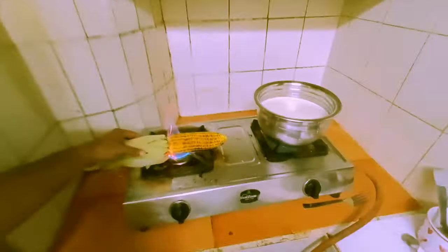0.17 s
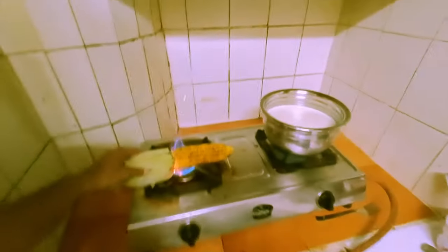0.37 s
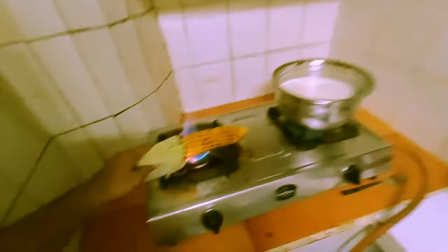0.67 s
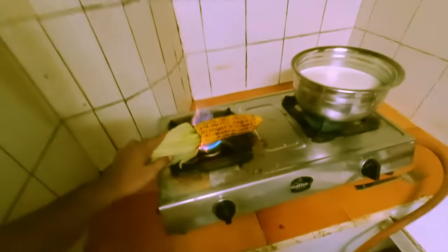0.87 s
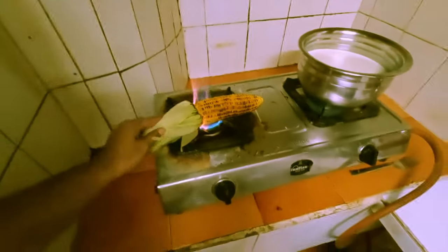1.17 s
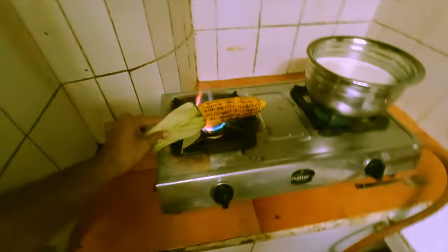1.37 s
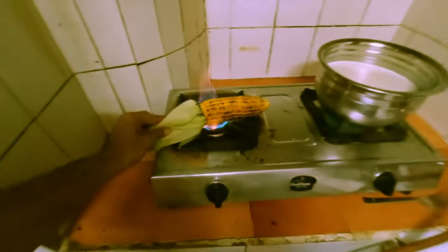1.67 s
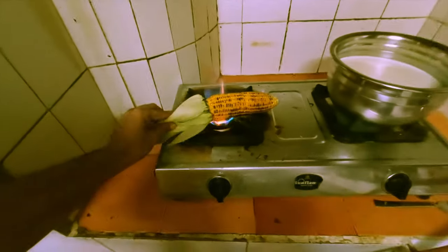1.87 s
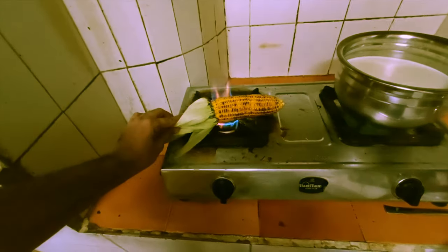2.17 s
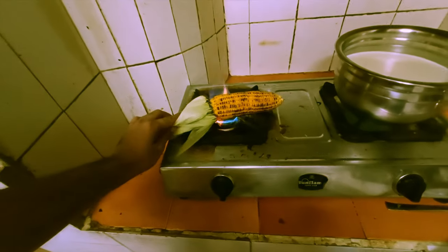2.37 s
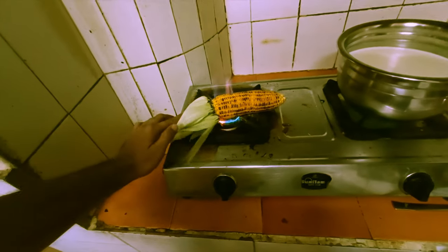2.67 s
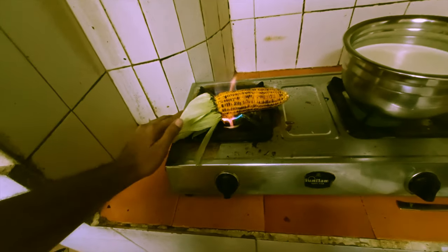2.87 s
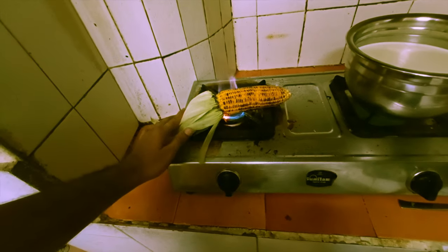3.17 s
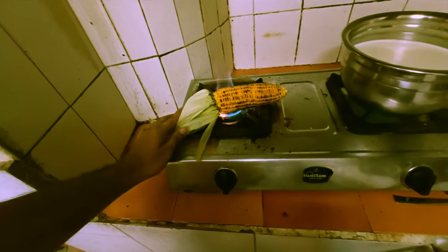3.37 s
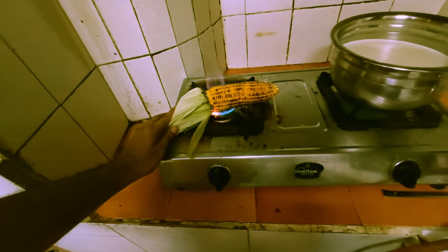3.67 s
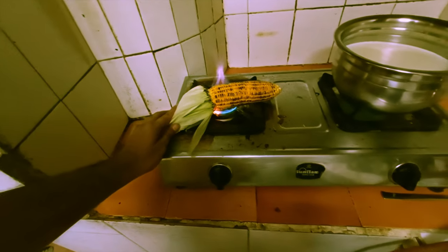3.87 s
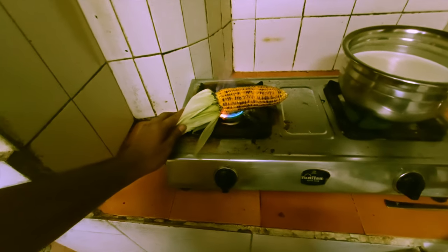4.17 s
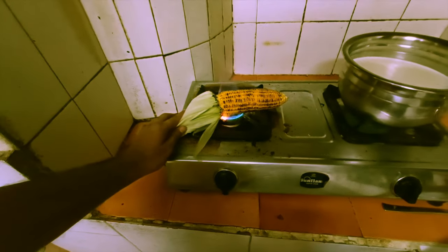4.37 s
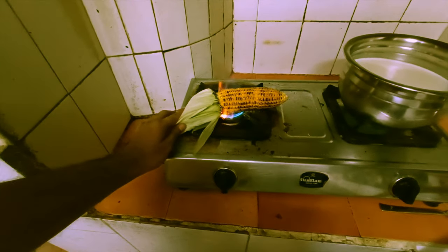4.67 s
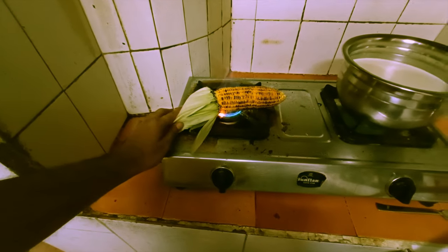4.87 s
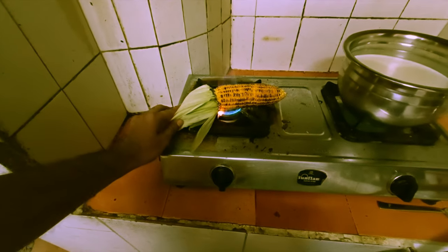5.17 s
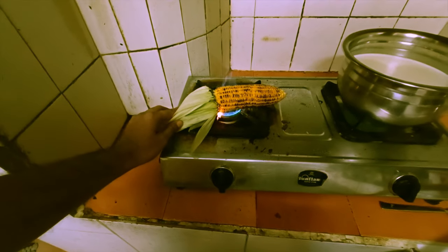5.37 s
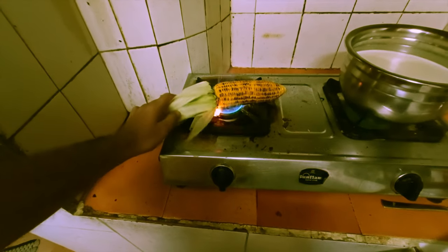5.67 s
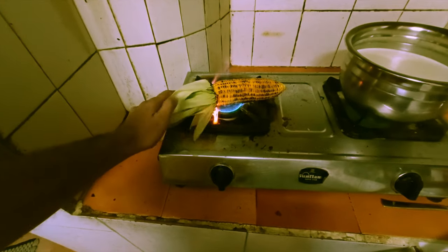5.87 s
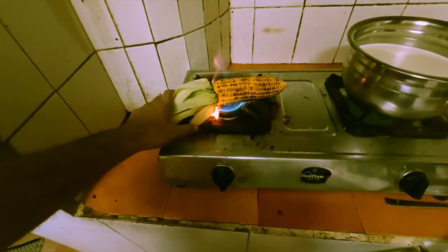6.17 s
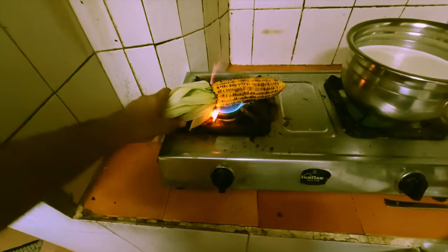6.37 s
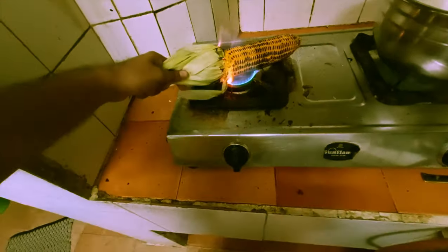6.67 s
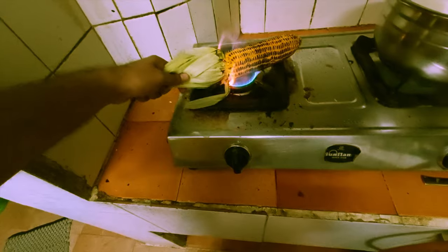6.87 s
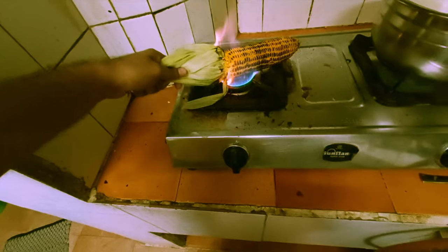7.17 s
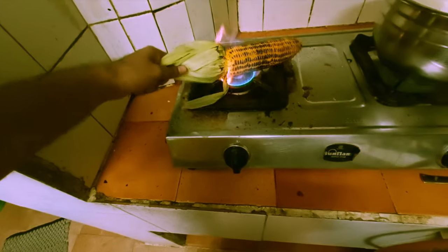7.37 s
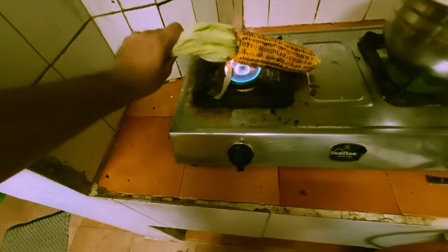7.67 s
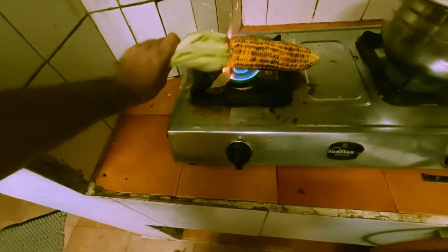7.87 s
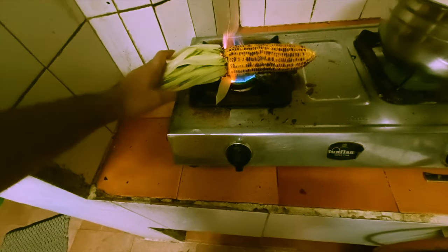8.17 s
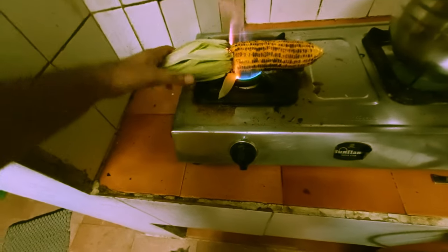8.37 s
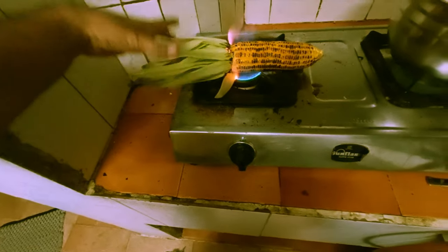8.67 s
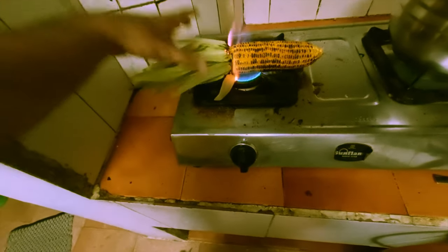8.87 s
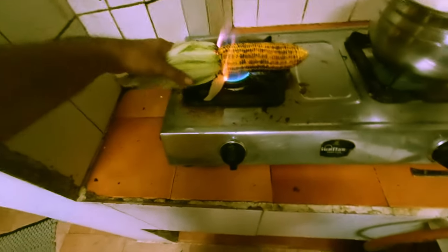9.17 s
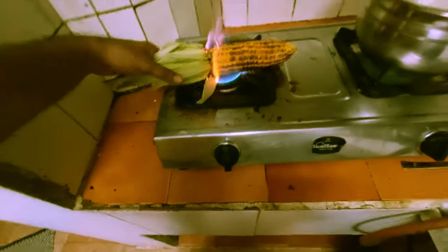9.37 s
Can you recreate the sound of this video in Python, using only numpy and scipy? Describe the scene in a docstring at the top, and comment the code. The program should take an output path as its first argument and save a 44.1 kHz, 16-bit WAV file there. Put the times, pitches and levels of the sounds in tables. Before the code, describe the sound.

A gas burner hisses softly throughout, with a low flame roar and tiny sizzles, close to a hand-held microphone in a tiled kitchen corner. For the first second, low handling thumps sit under a brief puff of steam and small pops from a roasting corn cob. Another bump and a few pops come around 1.3 seconds. Sharp, loud kernel pops follow at about 2.1, 2.4 and 2.9 seconds, each with a short echo, the last with a light ring of the metal stove. Only small ticks and very faint high tones follow until a loud cluster of pops and a steam puff at 5.5 seconds. Another loud pop lands at 6.2, and a quick, softer crackle near 6.9. Faint dry husk scrapes and light metal knocks come between 6 and 8 seconds. A few weak pops and knocks close it around 9 seconds.

```python
"""A puff of steam and low thumps of a hand on the camera, then sharp pops: a corn cob roasts over a gas
flame in a tiled kitchen corner, heard from the microphone of a hand-held camera. Kernels burst and
puff steam, and the near tiles answer each pop. The cob knocks the sheet-metal stove into ringing, its
dry husk scrapes the pan stand, faint thin tones come and go, and the burner hisses throughout."""
import sys
import numpy as np
from scipy import signal
from scipy.io import wavfile
from scipy.ndimage import uniform_filter1d

SR = 44100
rng = np.random.default_rng(int(sys.argv[2]) if len(sys.argv) > 2 else 0)


def unload_audio(sound):
    """Save the sound as a 16-bit wav file, at the path given as the first command line argument."""
    columns = np.transpose(np.atleast_2d(sound))
    # keep every value between -1 and 1, then stretch to whole-number steps
    steps = np.round(np.clip(columns, -1, 1) * 32767)
    wavfile.write(sys.argv[1], SR, steps.astype(np.int16))


N = 418950


def pops():
    """Pops, a snap in a short tear of noise; cob and hollow ring, the corner answers."""
    # Each row: start in seconds, level in dB, treble and low end in dB, tear decay in ms,
    # room and cob ring in dB, favoured cob pitch in Hz, hollow ring in dB.
    # The loudest pop is followed 3 ms later by a duller echo.
    pop_rows = [(0.3688, -25, -1, 9, 1, 3, -10, 2550, -12), (0.689, -39, 15.5, -8, 1.8, -2, -14, 4700, -20),
                (0.7578, -33.5, 9, -8, 1.6, 5, -10, 1600, -16),
                (0.961, -35, -1, 13.5, 2.7, -4, 1, 2680, -2),
                (1.0307, -30.5, -1, 10, 1.5, 3.5, -4, 2630, -15),
                (1.087, -41, 16, -8, 1.8, -10, -10, 4700, -20),
                (1.2026, -28.5, 2, -15, 1.7, -6.5, 7.5, 4060, -22),
                (1.2585, -15.5, 7, -2, 5.6, -6.5, -8, 4700, -12),
                (1.3222, -21, 4, -3, 3.4, -7.5, 3, 2820, -8),
                (2.0799, -13, 1.5, -28, 11, -7.5, -3, 2760, -20),
                (2.1477, -41, 16, -2, 1.8, -7.5, -5, 5110, -15), (2.325, -32, 4, 14, 2, 4.5, -15, 3800, 2),
                (2.3932, 1, 10.5, -22, 1.9, -1, -8.5, 4560, -36),
                (2.5024, -22, 14.5, -20, 3.8, -4, -10, 4890, -22),
                (2.9291, 3.5, 6.5, 2, 4, -2.5, -6.5, 4340, -31),
                (3.1662, -33.5, 4, 12, 2.8, -9, -3, 2760, -5),
                (3.359, -37.5, 12, -4, 1.4, 3, -3, 4790, -12), (3.9458, -31, 4, 8, 3.7, 3, 3, 3480, -6),
                (4.0512, -27.5, 8.5, 11.5, 1.6, -16, -7, 1870, -10),
                (4.8266, -35, 12, -12, 1.8, 1, -9, 4150, -20),
                (4.9683, -37.5, 18.5, -8, 2.9, -2, 4, 5070, -16),
                (5.4382, -8, 8, -5, 2.2, -3, -6, 4400, -12), (5.4853, 7.5, 1, 8, 1.4, -4.5, -4, 3230, -7),
                (5.488, 0.5, -12, -6, 0.97, 0, -4.5, 2040, -28),
                (5.539, -3.5, 12.5, -5, 1.1, 3.5, -18, 4720, -15),
                (6.0356, -34, 8, -3, 1.3, -11, -4, 3770, -12),
                (6.192, -0.5, 8.5, 1.5, 0.69, -5.5, -5, 4250, -17.5),
                (6.265, -27, 2, -5, 2.5, 3, 3, 3600, -5), (6.8016, -37.5, 13, -3, 1.8, 5, -3, 3470, -12),
                (6.8575, -17, 13.5, 3.5, .8, 0, 1, 4270, -21), (6.872, -34, -2, -6, 1.2, -10, 0, 3550, -19),
                (6.9135, -16, 10.5, -4, 0.61, -4.5, 0, 3500, -24),
                (6.9668, -20, 10, -3, 2.4, -3.5, 2, 3800, -10),
                (7.3068, -28, 12.5, -12, 4.4, -4, 0, 4340, -15),
                (7.826, -36.5, -9, 10, 1.7, 8, -3, 2600, -14), (7.3976, -35, 3, -9, 1.8, 9, -14, 2460, -20),
                (8.848, -34, -7, 15, 2.5, 3, -1, 3280, -13), (8.9811, -36, 4.5, -8, 2, 10, -3, 3160, -4),
                (9.0724, -42, 3, 22, 1.3, 7, 8, 2880, 5)]
    # Spectrum of a pop. Each row: frequency in Hz, relative level in dB.
    pop_colour = [(240, -37.5), (400, -11.5), (715, -12), (914, -8.5), (1420, -15.5), (1710, -19.5),
                  (2250, -16.5), (2430, -15.5), (3790, -4.5), (4420, -3.5), (6280, -14.5), (7900, -20.5),
                  (9800, -16), (12100, -15), (15500, -21)]
    # The air under the pan stand rings. Each row: pitch in Hz, relative level in dB, t60 in seconds.
    hollow_modes = [(913, -3, 0.71), (915, 6, 0.44), (924, 10, .09), (938, -3, 0.83), (1010, -2, 0.16),
                    (1010, -3, 0.25), (1101, 5, 0.43), (1184, -12.5, 0.097)]
    # The cob's woody modes, in Hz.
    cob_hz = [1710, 1980, 2676, 3130, 3445, 3640, 4330, 4700, 4790, 5730]
    cob_t60_s, cob_octaves = 0.022, 0.42
    t, out = np.arange(600) / SR, np.zeros(N)
    rooms = [corner() for _ in range(3)]
    colour = impulse_response(pop_colour)
    colour = np.pad(colour / np.linalg.norm(colour), (0, 10000))
    top = signal.sosfilt(butter(2, 7500, "high"), colour)
    bottom = signal.sosfilt(butter(2, 1700, "low"), colour)
    middle = colour - top - bottom
    body = signal.sosfilt(butter(2, 420, "high"), bottom)  # a kernel is too small for bass
    hollow = ringing(hollow_modes, len(colour))
    tears = rng.standard_normal((len(pop_rows), len(t)))
    for k, (s, db, treble_db, low_db, ms, room_db, cob_db, centre_hz, hollow_db) in enumerate(pop_rows):
        click = middle + amp(treble_db) * top + amp(low_db) * body + amp(hollow_db) * hollow
        cob_modes = [(hz, -10 * (np.log2(hz / centre_hz) / cob_octaves) ** 2, cob_t60_s) for hz in cob_hz]
        click += amp(cob_db) * ringing(cob_modes, len(click))  # modes near the favoured pitch lead
        age = t * 1000 / ms
        tear = tears[k] * np.minimum(age * 18, 1) * np.exp(-age)
        tear /= np.linalg.norm(tear)
        tear[20] -= 0.42  # the snap comes half a millisecond into the tear
        add(out, s, amp(db) * signal.fftconvolve(tear, click))
        add(out, s, amp(db + room_db) * signal.fftconvolve(click, rooms[k % 3]))
    return out


def knocks():
    """The cob sets the stove's sheet metal ringing, most of all near the touched spot's favoured pitch."""
    # Each row: start in seconds, ring level in dB, favoured pitch in Hz, spread in octaves,
    # boom level in dB, contact time in ms.
    contacts = [(1.251, -36.5, 298, 0.8, -46, 7.6), (1.318, -35, 332, 1.35, -38, 1.7),
                (1.772, -41.5, 590, 1.9, -49, 9.4), (2.0, -43, 610, 1.8, -41.5, 5.5),
                (2.075, -41, 395, 0.79, -54, 3.3), (2.391, -40.5, 356, 1.1, -56.5, 1.3),
                (2.927, -23.5, 225, 0.86, -35.5, 1.1), (3.637, -49, 200, 1.2, -42.5, 1.5),
                (3.84, -51, 200, 1.5, -53.5, 6), (5.484, -33.5, 222, 0.83, -61, 6.3),
                (6.19, -40.5, 260, 1.2, -69, 1.8), (6.468, -38, 467, 0.23, -63, 24),
                (6.48, -39, 960, 0.41, -66, 2.6), (6.53, -39, 705, 0.84, -63, 9.7),
                (6.59, -35, 574, 0.24, -65, 2.6), (7.141, -34.5, 308, 1.06, -60, 16),
                (7.18, -39.5, 435, 0.5, -60, 7.6), (7.232, -40, 198, 0.71, -66, 7.5),
                (7.821, -33.5, 255, 1.65, -46.5, 6.7), (8.848, -31, 377, 0.23, -69, 17),
                (8.848, -40.5, 205, 0.37, -64, 12), (8.849, -33, 803, 0.78, -72, 7.7),
                (9.073, -30, 870, 0.51, -69, 20)]
    # Modes of the sheet. Each row: pitch in Hz, relative level in dB, t60 in seconds.
    stove_modes = [(190.2, 4, 0.25), (226.3, 2, 0.26), (284, 5, 0.15), (311.6, 9.5, 0.077),
                   (377, 0.5, 0.21), (458.4, -7.5, 0.3), (557, 10, 0.079), (713, 5.5, 0.19), (782, -4, 0.3),
                   (955, 7.5, 0.1), (1110, -1, 0.12), (1317, 13, 0.061), (1452, 13, 0.086),
                   (1670, 11, 0.086), (2390, -6, .05), (2850, 21, .06), (3400, -6, .05)]
    boom_hz, boom_t60_s = 81, 0.85  # the whole stove top
    t, out = np.arange(SR * 3 // 4) / SR, np.zeros(N)
    hz, mode_db, t60 = np.transpose(stove_modes)[:, :, None]
    phases = 2 * np.pi * rng.random((len(contacts), len(stove_modes), 1))
    rattle = unit(uniform_filter1d(rng.standard_normal((len(contacts), len(t))), size=300, axis=1))
    boom = dying_sine(t, boom_hz, boom_t60_s)
    for k, (s, db, centre_hz, octaves, boom_db, ms) in enumerate(contacts):
        weights = amp(mode_db - 10 * (np.log2(hz / centre_hz) / octaves) ** 2)
        ring = (weights * dying_sine(t, hz, t60, phases[k])).sum(0) / np.linalg.norm(weights)
        ring *= 1 + 0.3 * rattle[k]  # the loose stand rattles against the sheet
        attack = 1 - np.exp(-t * 1000 / ms)
        add(out, s, (amp(db) * ring + amp(boom_db) * boom) * attack)
    return out


def steam():
    """Steam rushes from a split kernel: bright noise that rises, holds and dies away."""
    # Each row: start, rise and hold in seconds, level in dB, t60 in seconds.
    puffs = [(0.005, 0.0033, 0.0086, -39.5, 0.1), (5.554, .004, 0.054, -34, 0.34),
             (6.832, .006, .002, -31.5, 0.12), (6.906, .005, 0.017, -61, .2), (9.08, .01, 0.064, -72, 0.59)]
    # Spectrum of the rush. Each row: frequency in Hz, relative level in dB.
    steam_colour = [(400, -15), (1000, 5), (2500, -1.5), (4600, 4), (6000, -12), (7800, -9), (10000, 2),
                    (12300, -1.5), (15500, 9)]
    t, level = np.arange(SR // 2) / SR, np.zeros(N)
    for s, rise, hold, db, t60 in puffs:
        fall_db = 60 * np.maximum(t - rise - hold, 0) / t60
        add(level, s, np.minimum(t / rise, 1) * amp(db - fall_db))
    return level * noise(steam_colour, patchy_db=2.5, size=256)


def husk():
    """Dry leaves scrape the stand in dense uneven grains; each stroke swells quickly and dies slowly."""
    # Each row: start and length in seconds, level in dB, treble lift in dB.
    strokes = [(0.644, 0.099, -56, 3), (0.768, .05, -59, 10), (0.91, 0.059, -57.5, -1),
               (1.025, 0.15, -58, 11.5), (1.726, 0.13, -68, 18), (5.71, 0.12, -60, 10),
               (6.214, 0.13, -53, 4), (6.34, .03, -60, 6), (6.425, .2, -53, 14.5), (7.038, 0.067, -75, 31),
               (7.46, 0.099, -71, 23)]
    # Spectrum of a grain. Each row: frequency in Hz, relative level in dB.
    husk_colour = [(180, -35), (300, -53), (446, -25), (509, -3.5), (985, -4), (1420, -16), (3230, -5.5),
                   (4880, -8.5), (5480, -30), (9930, -24), (15500, -22)]
    grains_per_s, peak_share = 3000, 0.2
    grains = amp(1.2 * rng.exponential(1, N)) * (rng.random(N) < grains_per_s / SR)
    grains *= rng.standard_normal(N)
    rustle = unit(signal.oaconvolve(grains, impulse_response(husk_colour))[:N])
    top = signal.sosfiltfilt(butter(4, 7000, "high"), rustle)
    t, out = np.arange(N) / SR, np.zeros(N)
    for s, length, db, treble_db in strokes:
        swell = np.sqrt(np.interp(t, [s, s + peak_share * length, s + length], [0, 1, 0]))
        out += amp(db) * swell * (rustle - top + amp(treble_db) * top)
    return out


def grip():
    """Handling noise at the microphone: bumps ring the camera body over a lumpy rumble."""
    # Each row: start in seconds, then levels of the middle, low and top mode in dB.
    bumps = [(0.0, -20, -29, -34), (.083, -19.5, -21, -37.5), (0.164, -19, -21.5, -34),
             (0.218, -15.5, -44, -30), (0.245, -15.5, -21, -32), (0.307, -53, -7.5, -39),
             (0.328, -17.5, -11.5, -28), (0.391, -36, -14, -49), (.425, -28.5, -53, -45),
             (0.533, -42, -28, -58), (0.629, -51, -30.5, -62), (0.758, -12, -22, -37)]
    # The body's middle, low and top mode. Each row: pitch in Hz, t60 in seconds.
    camera_modes = [(96.2, 0.14), (52.5, 0.26), (270.5, 0.045)]
    # Rumble of the grip. Each row: time in seconds, level in dB.
    rumble_levels = [(0.85, -62), (1.16, -58), (1.28, -54), (1.55, -51), (1.67, -40.5), (1.8, -56.5),
                     (2.3, -55.5), (2.8, -59), (2.95, -62), (3.43, -59), (3.7, -48), (3.98, -50),
                     (4.15, -62), (5.5, -63), (6.4, -57.5), (7.6, -56), (8.9, -59.5), (9.3, -57),
                     (9.5, -55)]
    # Its spectrum. Each row: frequency in Hz, relative level in dB.
    rumble_colour = [(8, -14), (20, 26.5), (50, 16), (80, -6), (150, -58), (400, -64)]
    press_at_s, press_in_s, press_db = 1.232, 0.056, -25  # the hand presses the camera once
    out = gain_curve(rumble_levels) * noise(rumble_colour, patchy_db=2.5, size=4096)
    t = np.arange(SR // 2) / SR
    attack = 1 - np.exp(-t / 0.0025)
    modes = np.array([dying_sine(t, hz, t60) * attack for hz, t60 in camera_modes])
    modes[1] *= -1  # the low mode starts by swinging the other way
    for s, *levels_db in bumps:
        add(out, s, amp(levels_db) @ modes)
    size = round(press_in_s * SR)
    press = np.concatenate([np.hanning(size), -np.hanning(2 * size) / 2])  # in, then slowly back
    add(out, press_at_s, amp(press_db) * press)
    return out


def thin_tones():
    """Faint, thin, fuzzy high tones, some gliding in pitch."""
    # Each row: start and length in seconds, first and last pitch in Hz, level in dB, width in Hz.
    tones = [(4.747, 0.1, 11750, 11900, -64, 150), (5.04, .12, 11600, 11300, -66, 250),
             (5.13, 0.18, 10300, 10300, -71, 220), (6.028, 0.098, 12700, 11000, -66, 200),
             (6.216, 0.099, 11500, 11600, -65, 200), (6.301, 0.1, 11100, 11800, -61, 200),
             (7.048, 0.086, 2000, 1970, -67.5, 8.7), (7.261, 0.042, 11100, 9300, -62, 250),
             (7.392, 0.046, 2470, 2500, -61.5, 16), (8.099, 0.021, 6750, 6750, -63, 34)]
    out = np.zeros(N)
    for s, length, start_hz, end_hz, db, width_hz in tones:
        size = round(length * SR)
        fuzz = uniform_filter1d(rng.standard_normal((2, SR // 4)), round(SR / width_hz / 2))[:, :size]
        carrier = np.exp(2j * np.pi * np.cumsum(np.geomspace(start_hz, end_hz, size)) / SR)
        tone = unit((carrier * (unit(fuzz[0]) + 1j * unit(fuzz[1]))).real)
        add(out, s, amp(db) * tone * signal.windows.tukey(size, 0.5))
    return out


def burner():
    """The gas jet hisses above the flame's soft roar, with tiny sizzles."""
    # The burner fades a little as the camera moves. Each row: time in seconds, hiss and roar in dB.
    levels = [(0.0, -59.5, -57.5), (1.3, -58.5, -57.5), (2.5, -59.5, -58.5), (4.6, -60.5, -59),
              (5.4, -60, -58), (6.3, -57.5, -57), (6.7, -61, -60), (7.1, -60, -57.5), (8.3, -60.5, -60.5),
              (8.8, -61.5, -60), (9.1, -57.5, -56.5), (9.5, -62, -58)]
    # Spectra of jet and flame. Each row: frequency in Hz, relative level in dB.
    hiss_colour = [(820, -13.5), (1400, -4.5), (2070, -4.5), (2560, -2.5), (3460, -1.5), (4070, -4.5),
                   (4780, 1), (5840, -9), (7820, -15), (9960, -6), (10900, -9), (12300, -2.5), (14000, -9),
                   (15500, -6.5)]
    roar_colour = [(44, -5.5), (75, 4), (129, -12), (178, -3.5), (324, -9), (395, -5), (559, -10),
                   (890, -7.5), (976, -8.5), (1800, -22.5), (2340, -79), (3960, -120)]
    # The top of the hiss drifts. Each row: time in seconds, treble lift in dB.
    treble_lift = [(0, -2), (1.3, -2), (2.2, -2.5), (4.5, 0), (4.95, 0.5), (6.4, 1), (6.65, -2), (7.1, 0),
                   (8.7, -1.5), (9.5, 0.5)]
    sizzles_per_s, sizzle_db = 30, -10.5
    ticks = amp(3.5 * np.minimum(rng.exponential(1, N), 2.5)) * (rng.random(N) < sizzles_per_s / SR)
    ticks *= rng.choice([-1, 1], N)
    sizzle = signal.oaconvolve(ticks, impulse_response(hiss_colour))[:N]
    sizzle += signal.oaconvolve(sizzle, corner())[:N]
    hiss = noise(hiss_colour, patchy_db=1.7, size=1024) + amp(sizzle_db) * unit(sizzle)
    top = signal.sosfiltfilt(butter(4, 8500, "high"), hiss)
    hiss = hiss - top + gain_curve(treble_lift) * top
    roar = noise(roar_colour, patchy_db=1.6, size=2048)
    return gain_curve(levels) * hiss + gain_curve(levels, column=2) * roar


def corner():
    """Impulse response of the tiled corner: dense reflections, each band dying at its own speed."""
    # Each row: frequency in Hz, t60 in seconds.
    decay_times = [(300, 0.3), (1000, 0.44), (2500, 0.38), (5000, 0.48), (9000, 0.42), (14000, 0.2)]
    size = SR // 2
    hz, frame_s, spectra = signal.stft(rng.standard_normal(size), SR, nperseg=128)
    decay = amp(-60 * frame_s / at_hz(decay_times, hz)[:, None])
    tail = signal.istft(spectra * decay, SR, nperseg=128)[1][:size]
    t = np.arange(size) / SR
    onset = np.clip((t - 0.0015) / 0.0027, 0, 1)
    tail *= onset * (1 + 13.4 * np.exp(-t / 0.041))  # near walls answer first and strongest
    return tail / np.linalg.norm(tail)


def noise(colour, patchy_db, size):
    """Coloured noise of rms 1 with drifting patches of level."""
    hop = size // 4
    frames, hz = N // hop + 5, np.fft.rfftfreq(size, 1 / SR)
    real, imag, patches = rng.standard_normal((frames, len(hz), 3)).T
    patches = unit(uniform_filter1d(uniform_filter1d(patches, size=16, axis=0), size=10, axis=1))
    spectra = (real + 1j * imag) * amp(at_hz(colour, hz)[:, None] + patchy_db * patches)
    return unit(signal.istft(spectra, nperseg=size, noverlap=size - hop)[1][:N])


def impulse_response(colour, size=4096):
    """A click with the given spectrum and nothing before the hit (minimum phase)."""
    log_gain = np.log(amp(np.maximum(at_hz(colour, np.fft.rfftfreq(size, 1 / SR)), -60)))
    mirrored = np.concatenate([log_gain, log_gain[-2:0:-1]])
    return np.fft.ifft(np.exp(np.conj(signal.hilbert(mirrored)))).real[:size // 2]


def ringing(modes, size):
    """Dying modes with a total energy of 1."""
    hz, db, t60 = np.transpose(modes)[:, :, None]
    ring = (amp(db) * dying_sine(np.arange(size) / SR, hz, t60)).sum(0)
    return ring / np.linalg.norm(ring)


def dying_sine(t, hz, t60, phase=0):
    """One mode, falling 60 dB in t60 seconds."""
    return amp(-60 * t / t60) * np.sin(2 * np.pi * hz * t + phase)


def butter(order, hz, kind):
    """High-pass or low-pass filter sections."""
    return signal.butter(order, hz, kind, fs=SR, output="sos")


def amp(db):
    """Decibels to gain."""
    return 10 ** (np.asarray(db) / 20)


def unit(x):
    """Scales to rms 1."""
    return x / np.sqrt(np.mean(x ** 2) + 1e-20)


def at_hz(points, hz):
    """Reads a table on a log-frequency axis."""
    points_hz, values = np.transpose(points)
    return np.interp(np.log(hz + 1), np.log(points_hz + 1), values)


def gain_curve(rows, column=1):
    """A table's dB column as a gain at every sample."""
    rows = np.array(rows)
    return amp(np.interp(np.arange(N) / SR, rows[:, 0], rows[:, column]))


def add(mix, s, sound):
    """Mixes a sound in at s seconds."""
    part = mix[round(s * SR):][:len(sound)]
    part += sound[:len(part)]


def scene():
    """All sources as they meet at the microphone, in mono."""
    return (pops() + knocks() + grip() + burner() + husk() + steam() + thin_tones())[None]


def record(dry):
    """The camera lowers the top band, then cuts everything above it."""
    shelf_hz, edge_hz, shelf_gain = 15650, 16500, amp(-32)
    shelf, edge = [signal.firwin(801, hz, window=("kaiser", 9), fs=SR) for hz in (shelf_hz, edge_hz)]
    return signal.oaconvolve(dry, ((1 - shelf_gain) * shelf + shelf_gain * edge)[None], "same")


dry = scene()
out = record(dry)
unload_audio(out)
```